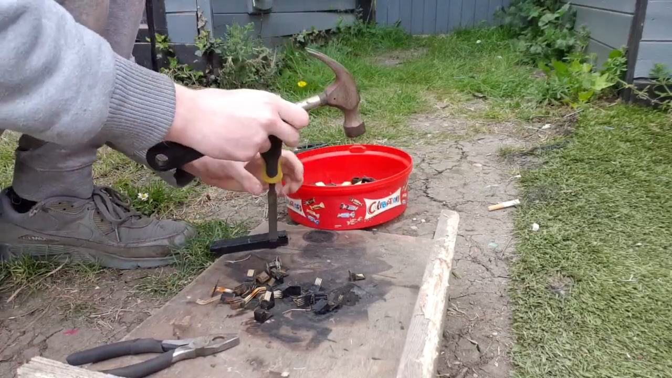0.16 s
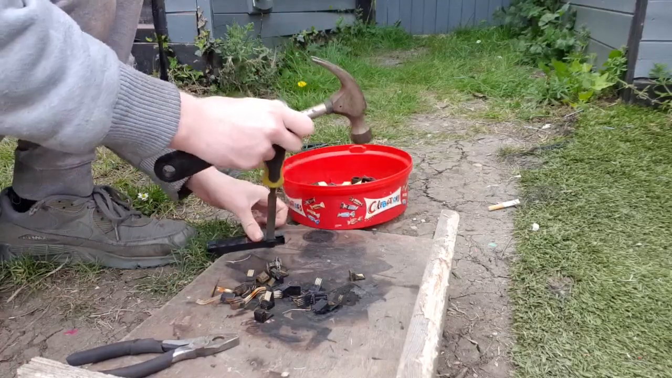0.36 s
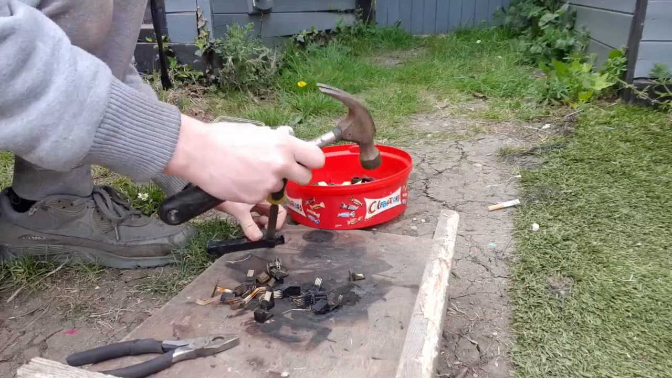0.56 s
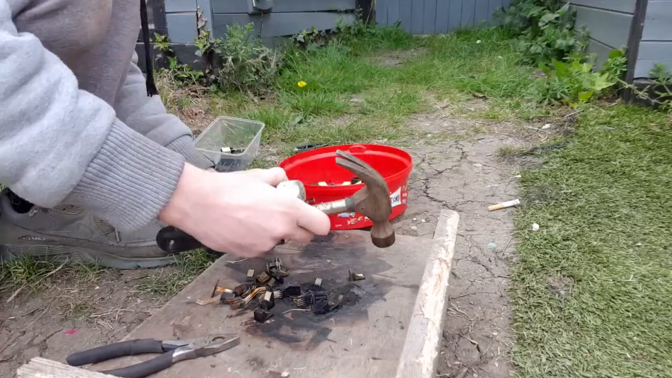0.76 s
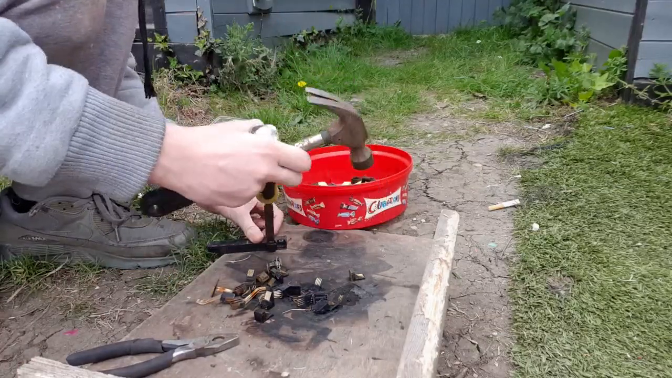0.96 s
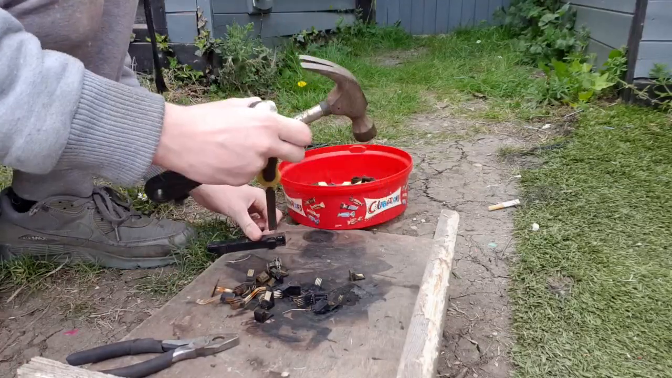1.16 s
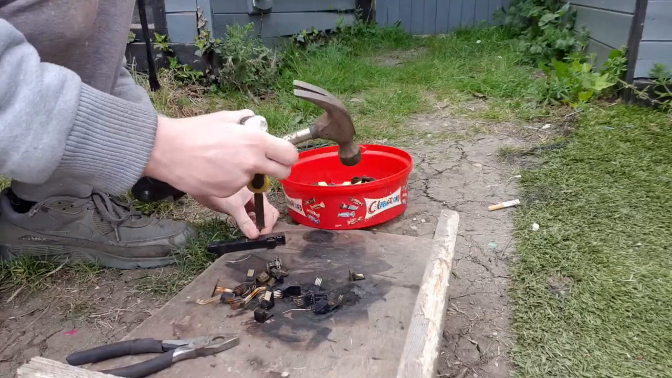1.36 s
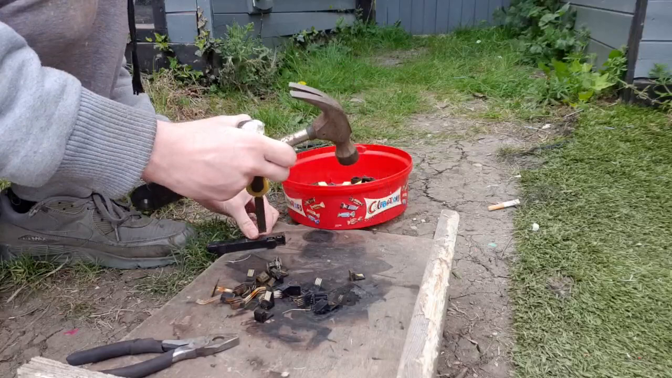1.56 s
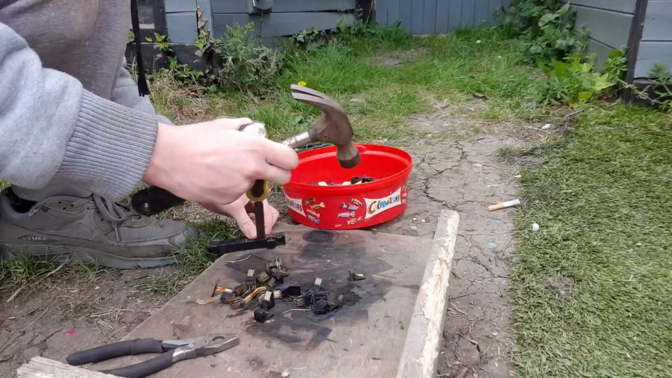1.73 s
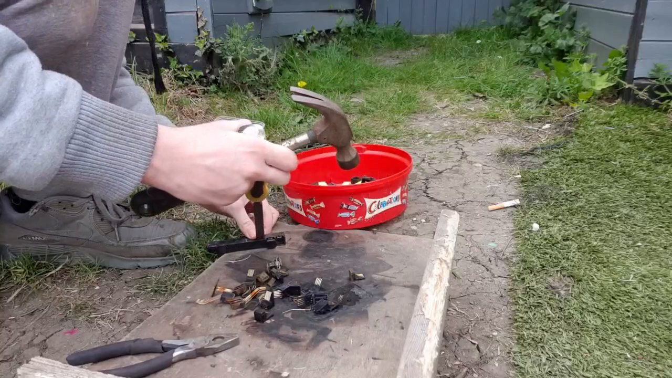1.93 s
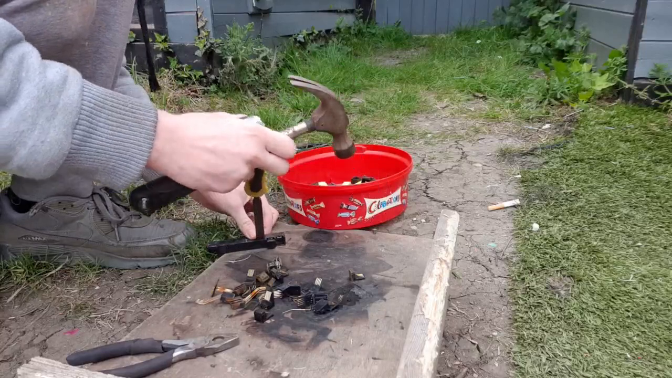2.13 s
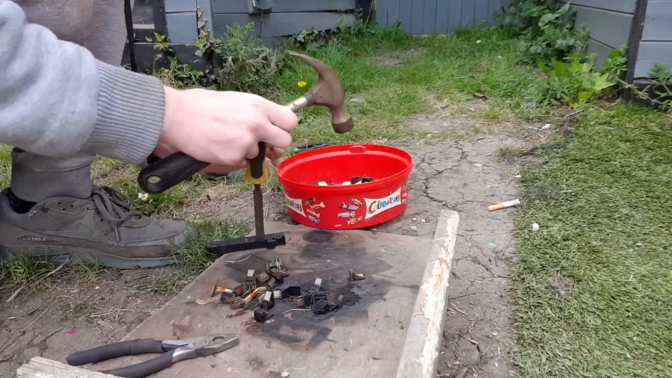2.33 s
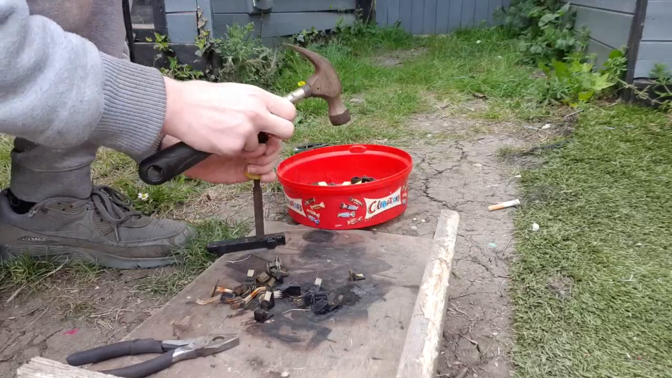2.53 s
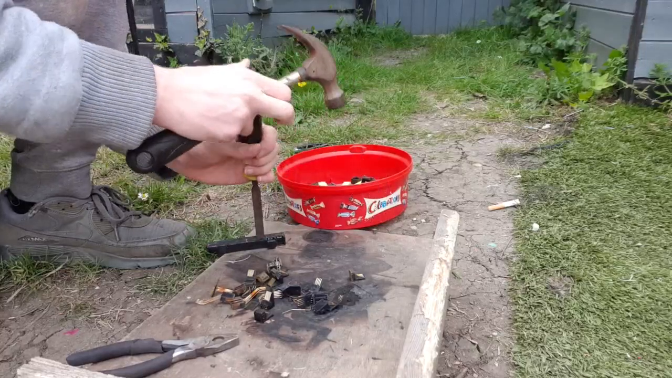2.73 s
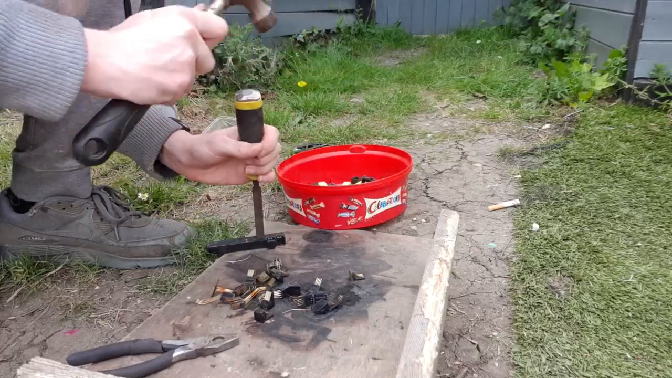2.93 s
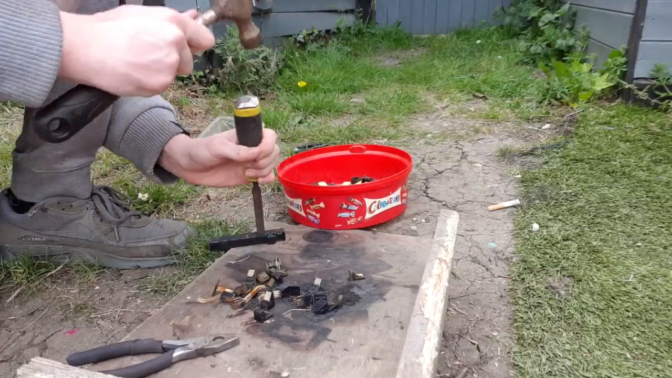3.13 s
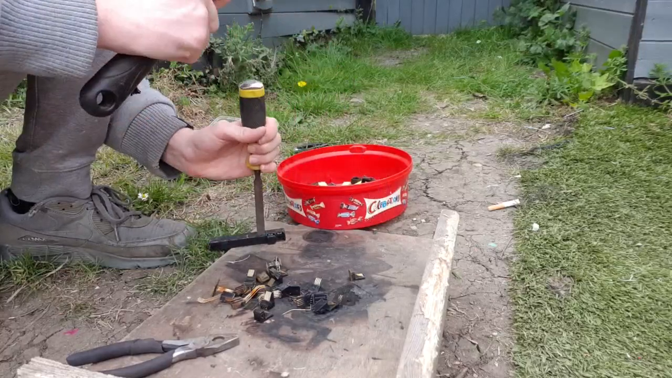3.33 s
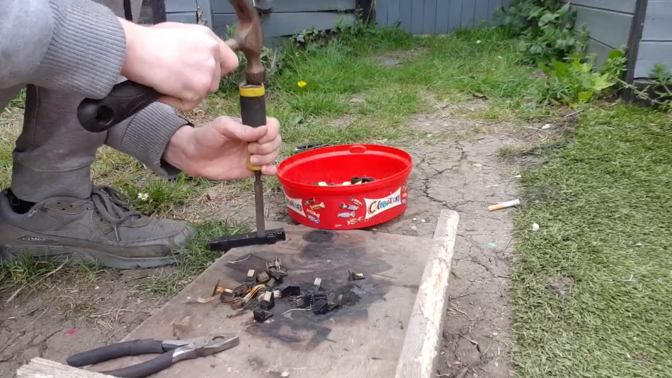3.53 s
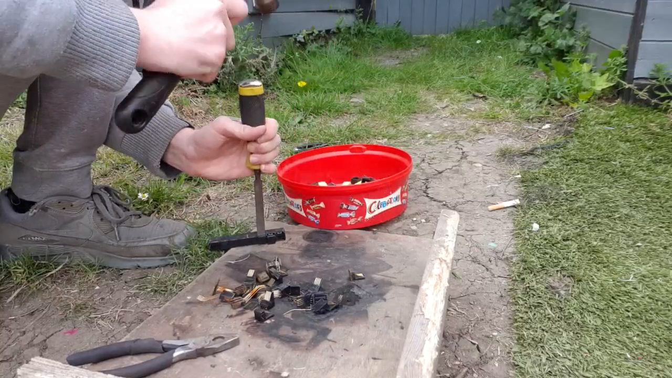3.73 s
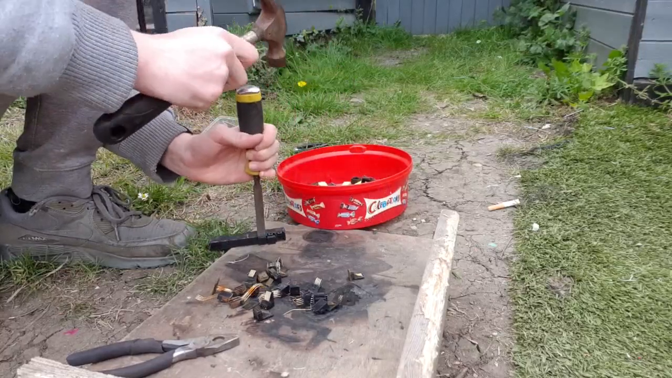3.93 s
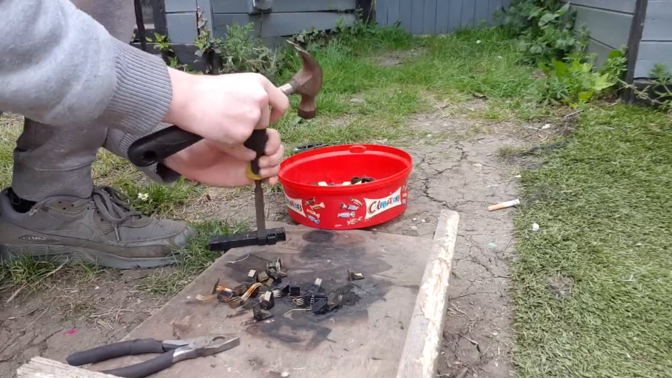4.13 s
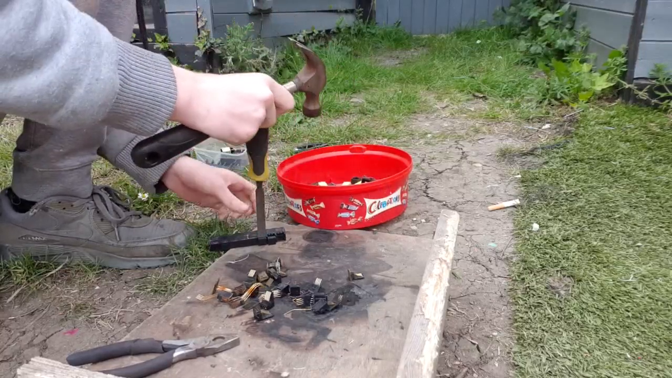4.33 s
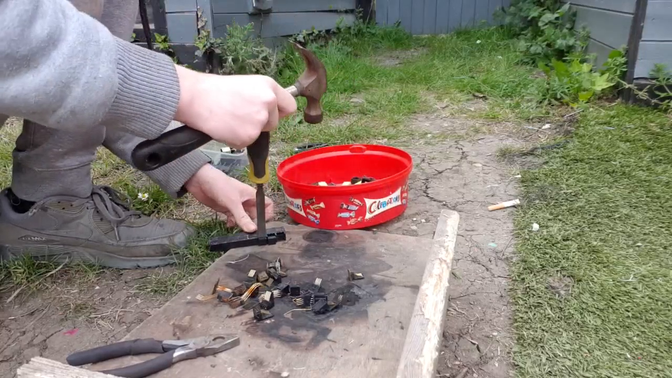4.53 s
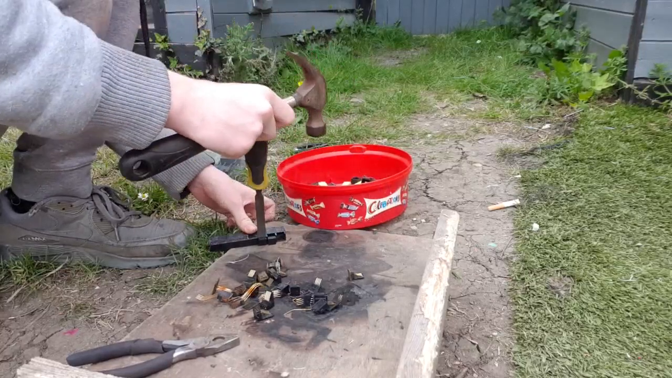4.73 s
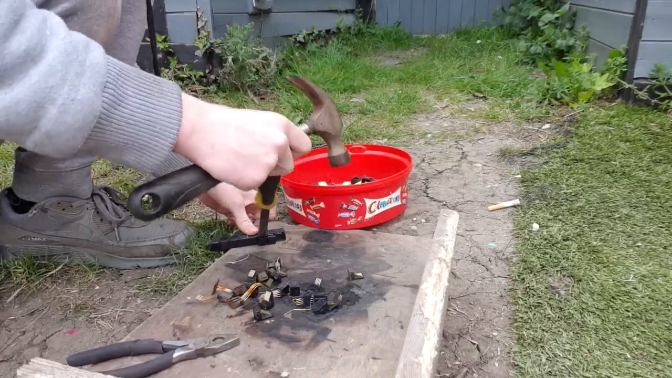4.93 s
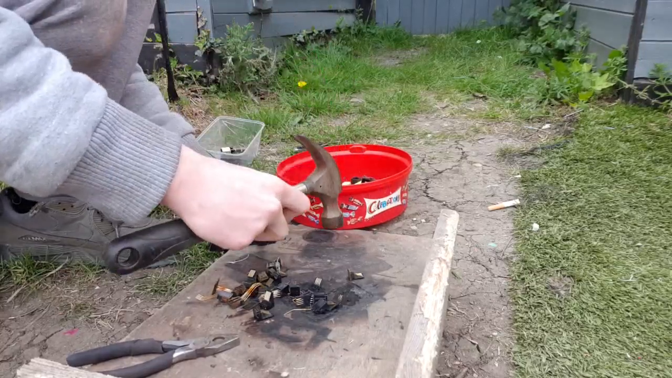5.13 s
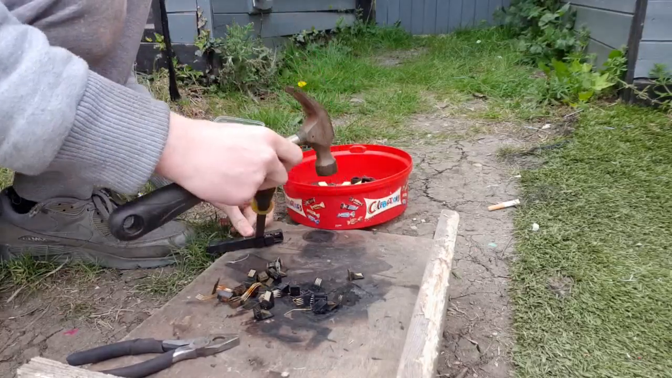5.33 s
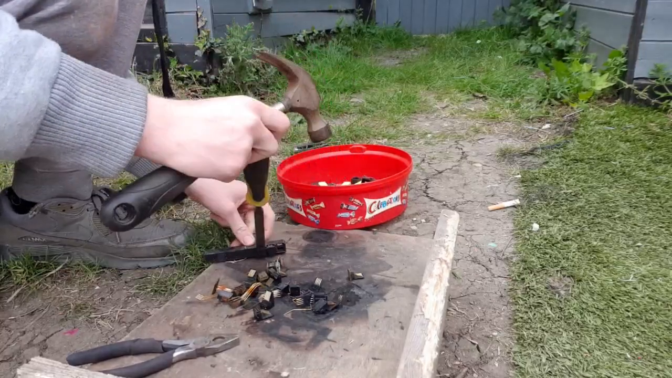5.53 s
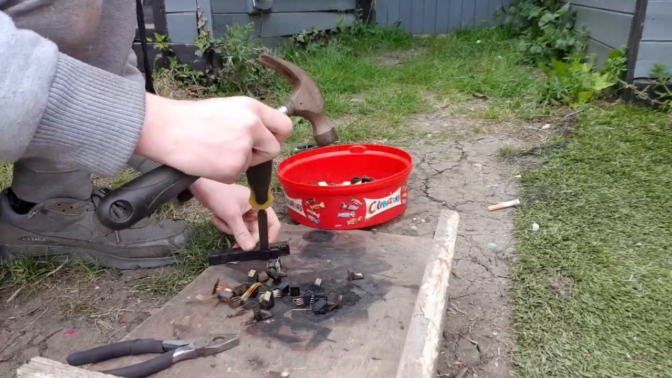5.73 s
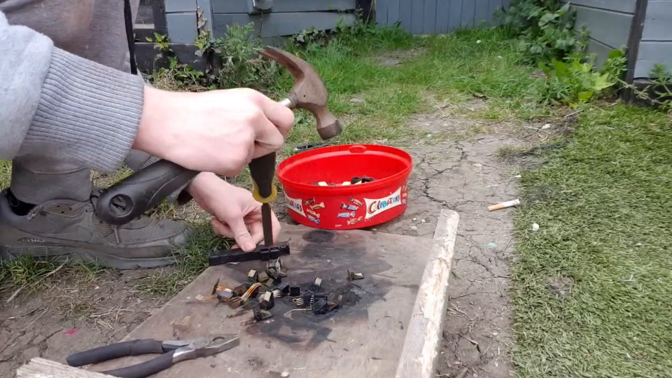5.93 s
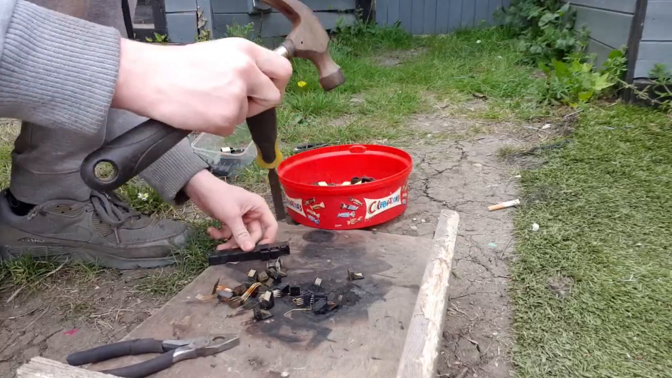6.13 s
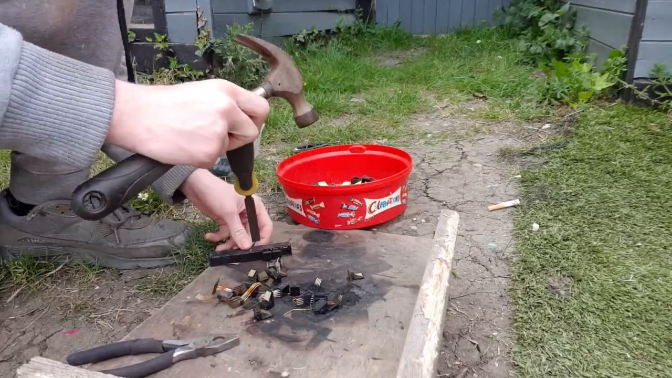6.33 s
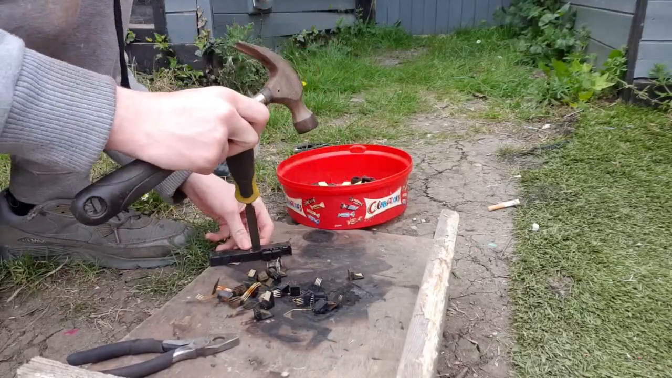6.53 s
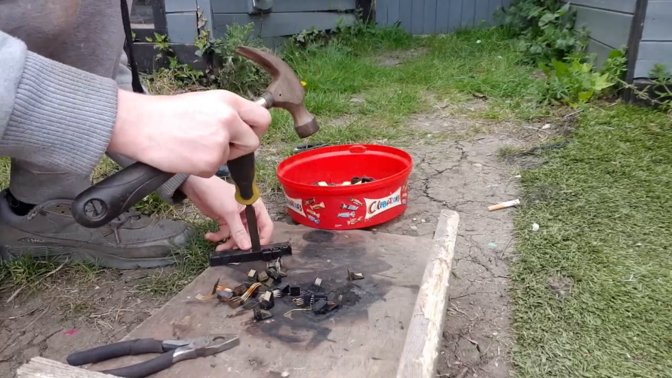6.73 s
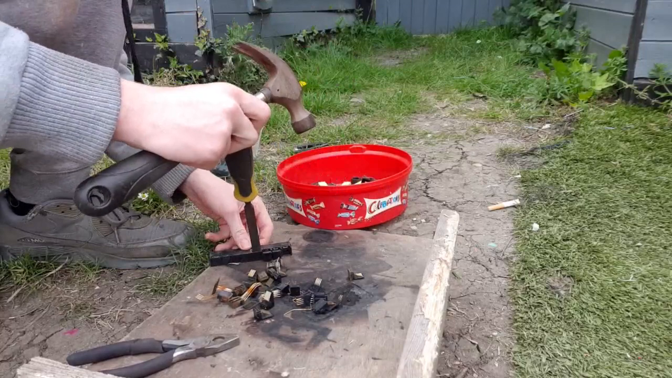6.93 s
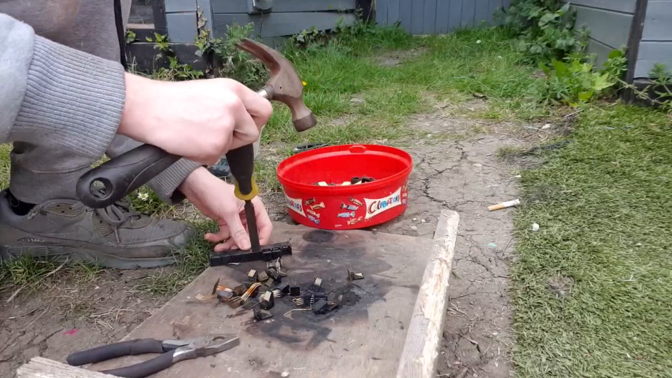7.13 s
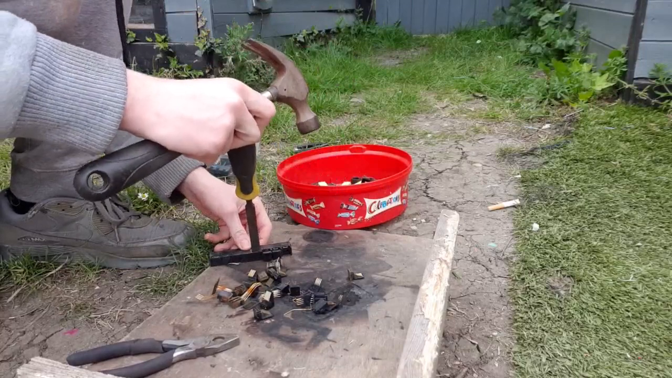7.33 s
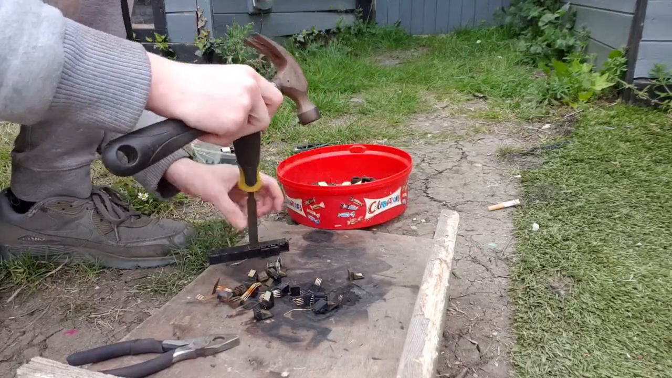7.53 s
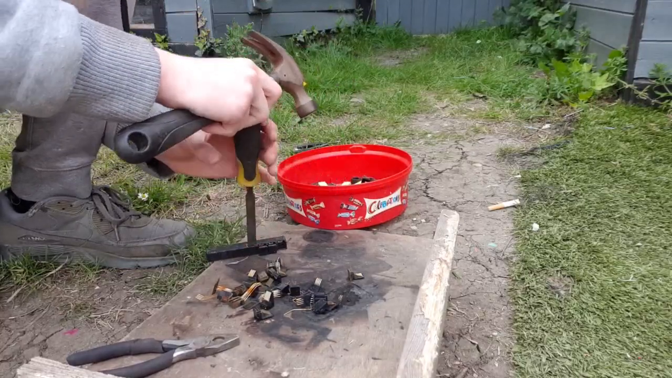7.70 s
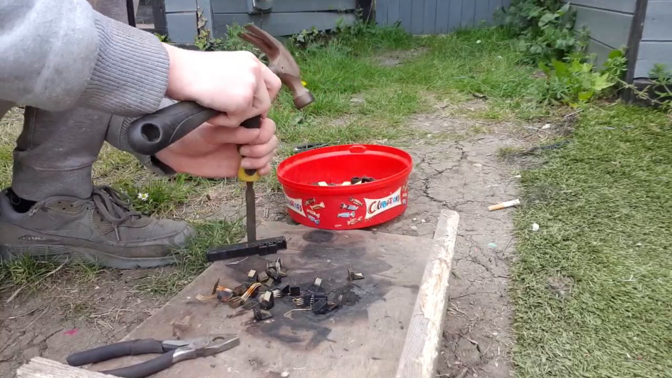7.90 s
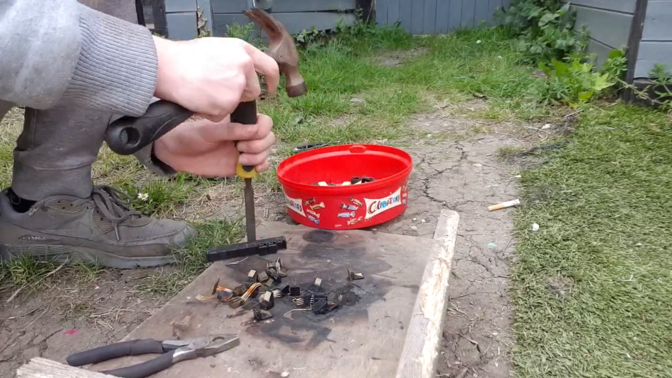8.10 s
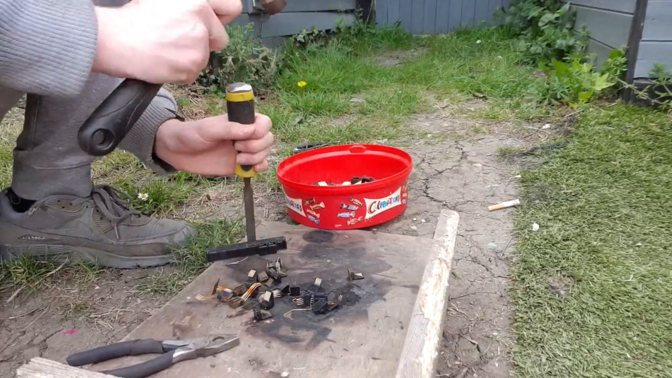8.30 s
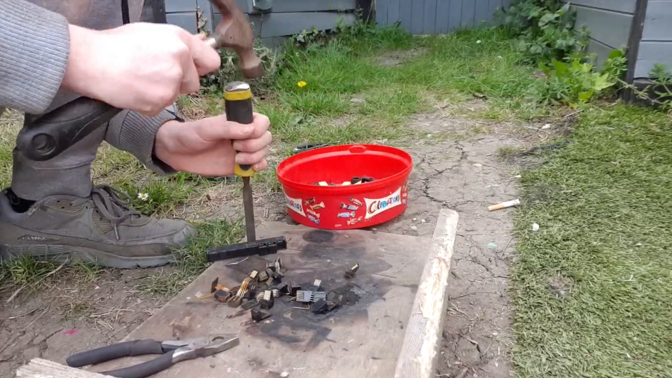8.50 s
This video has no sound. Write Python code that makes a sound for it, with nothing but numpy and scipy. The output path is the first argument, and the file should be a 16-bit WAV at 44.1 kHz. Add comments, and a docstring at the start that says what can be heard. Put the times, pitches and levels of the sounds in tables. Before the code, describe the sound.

Plastic bits are shifted and scraped on a thin plank for about three seconds, then four hard, dry hammer knocks come within just over a second, each with a woody clack and short outdoor slap. A weaker knock follows, then quiet scraping and ticking, and a last loud crack with rebounds. Low wind buffets and a very faint distant hiss are picked up close by.

```python
"""A small fenced garden: a claw hammer drives a screwdriver into plastic connectors on a wooden board.
Each blow is a noise crack of giving plastic over damped modes of board and shaft; then the blade lands
and the hammer bounces. The fences scatter it back as a short wash of noise in bands.
Between blows come light taps, ticks, clicks, a faint falling squeak, and scrapes of dense random slips.
Beneath lie shaped noises: light wind, its buffets and a faint distant hiss."""
import sys
import numpy as np
from scipy import signal
from scipy.fft import rfft, irfft, next_fast_len
from scipy.io import wavfile
from scipy.ndimage import uniform_filter1d

SR = 44100
rng = np.random.default_rng(int(sys.argv[2]) if len(sys.argv) > 2 else 0)


def master_out(mix):
    """Clip the mix to full scale and print it as 16-bit PCM to the path in sys.argv[1]."""
    frames = np.transpose(np.atleast_2d(mix))
    ceiling = np.clip(frames, -1, 1)
    pcm = np.round(ceiling * 32767).astype(np.int16)
    wavfile.write(sys.argv[1], SR, pcm)


N = 381906
TIME = np.arange(N) / SR
AGE = TIME[:SR // 5]  # time since a contact [s]
TOP_HZ = 16000  # upper limit of the wash and of the finished sound
BLOW_SAMPLES = SR // 100  # a unit blow has the energy of 10 ms at full level

# ringing of the screwdriver shaft: (nominal frequency [Hz], relative level [dB], t60 at length 1 [s])
SHAFT_MODES = [(3206, -1, 0.085), (4370, -5, 0.068), (5145, -6, .05), (5722, 0.5, .055)]
# colour of cracking and rasping plastic: (frequency [Hz], relative level [dB])
CRACK_COLOUR = [(900, -32.5), (1700, -14), (2400, -1.5), (3200, 2.5), (4200, 2.5), (5700, -3), (6600, -8),
                (7600, -19.5), (12000, -39)]
# colour of the brightest snap and scrape hiss: (frequency [Hz], relative level [dB])
SNAP_COLOUR = [(4000, -35.5), (7000, -7), (8500, -5.5), (10200, 1.5), (12800, 0), (16000, -3)]


def undb(db):
    """Decibels to gain."""
    return 10 ** (np.asarray(db) / 20)


def on_log_axis(points, size):
    """A (frequency [Hz], level [dB]) curve at the bins of a transform."""
    hz, db = np.transpose(points)
    bin_hz = np.arange(size // 2 + 1) * SR / size
    return np.interp(np.log(bin_hz + 1), np.log(hz), db)


def colour(x, points, size=2048):
    """Causal filter of unit energy: folding the cepstrum gives the spectrum its minimum phase."""
    cepstrum = irfft(np.log(undb(on_log_axis(points, size))))
    cepstrum[1:size // 2] *= 2
    cepstrum[size // 2 + 1:] = 0
    response = irfft(np.exp(rfft(cepstrum)))
    response /= np.linalg.norm(response)
    return signal.fftconvolve(x, response[None], axes=1)[:, :x.shape[1]]


def noise(size, width):
    """Stereo noise; width is side over mid."""
    mid, side = rng.standard_normal((2, size))
    return np.array([mid + width * side, mid - width * side]) / np.hypot(1, width)


def add(out, s, sound):
    """Mix a sound in at a time."""
    start = max(int(s * SR), 0)
    out[:, start:start + sound.shape[-1]] += sound[..., :N - start]


def wind():
    """Wind rumbles on the microphone ports: low noise that follows a slow level curve."""
    # strength of the wind: (time [s], level before a 2 dB lift [dB])
    wind_curve = [(0, -62), (.8, -76.5), (1.12, -60), (1.75, -79.5), (2.0, -61.5), (3.0, -59), (3.5, -67.5),
                  (3.95, -59), (4.25, -71.5), (5.6, -71.5), (6.6, -62.5), (8.66, -68)]
    # colour of the rumble: (frequency [Hz], relative level [dB])
    rumble_colour = [(20, -14.5), (45, 0.5), (62, 6), (100, -5), (160, -16), (250, -23.5), (500, -60.5)]
    level_db = np.interp(TIME, *np.transpose(wind_curve)) + 2.0
    return undb(level_db) * colour(noise(N, width=0.38), rumble_colour)


def buffets():
    """Short Gaussian swells of low noise, mostly on the right port."""
    # single buffets: (peak time [s], Gaussian length [s], level before the side gains [dB])
    gust_list = [(1.053, 0.025, -49), (1.898, 0.049, -42), (2.061, 0.019, -42.5), (2.163, 0.024, -50),
                 (2.455, 0.05, -38.5), (2.697, 0.029, -48.5), (2.92, 0.095, -50.5), (6.705, 0.057, -50)]
    # colour of a buffet: (frequency [Hz], relative level [dB])
    buffet_colour = [(20, -17), (45, 1.5), (70, 6), (110, -0.5), (170, -17.5), (260, -27), (500, -61.5)]
    swell = sum(undb(db) * np.exp(-((TIME - s) / length) ** 2) for s, length, db in gust_list)
    side_gain = undb([[-16], [3]])  # left, right
    return swell * colour(noise(N, width=0.89), buffet_colour) * side_gain


def distant_hiss():
    """A faint hiss of coloured noise that follows a slow level curve."""
    # strength of the hiss: (time [s], level [dB])
    hiss_curve = [(0, -70.5), (1.4, -75), (2.6, -66.5), (3.4, -73.5), (4.4, -75), (6.1, -73.5),
                  (7.8, -67.5), (8.66, -68.5)]
    # colour of the air: (frequency [Hz], relative level [dB])
    air_colour = [(30, -0.5), (150, 2.5), (350, -7), (680, -6.5), (1150, -17.5), (1600, -13), (2100, -5.5),
                  (3800, -14), (6000, -23.5), (8000, -36), (12500, -20), (16000, -29.5)]
    level_db = np.interp(TIME, *np.transpose(hiss_curve))
    return undb(level_db) * colour(noise(N, width=.7), air_colour)


def drain(power, seconds):
    """Energy that leaks away with a time constant."""
    keep = np.exp(-1 / (seconds * SR))
    return signal.lfilter([1 - keep], [1, -keep], power)


def garden(x, count=10):
    """Ground, plants and fences scatter each band's energy into a smooth, short wash of noise."""
    # scattered tail: (frequency [Hz], level [dB], t60 of the near echo [s])
    tail_bands = [(603, -18.5, .33), (1600, -5, 0.17), (4500, -7, 0.235), (12000, -5, 0.125)]
    late_db, late_stretch = -14, 2  # far fences: echo level, and decay time over the near one
    edges = np.geomspace(300, TOP_HZ, count)
    hz, tail_db, tail_t60 = np.transpose(tail_bands)
    wash, out = noise(N, width=0.94), 0
    for lo, hi in zip(edges, edges[1:]):
        centre = np.log(lo * hi) / 2
        db = np.interp(centre, np.log(hz), tail_db)
        t60 = np.interp(centre, np.log(hz), tail_t60)
        band = signal.butter(3, [lo, hi], "bandpass", fs=SR, output="sos")
        # a trace of noise keeps the power above zero
        power = np.mean(signal.sosfilt(band, x + 1e-12 * wash) ** 2, axis=0)
        power = drain(power, .004)  # the echoes build up, then drain away
        seconds = t60 / np.log(1e6)
        near = drain(power, seconds)
        far = undb(late_db) ** 2 * drain(power, late_stretch * seconds)
        carrier = signal.sosfilt(band, wash)
        out = out + undb(db) * np.sqrt(near + far) * carrier / carrier.std()
    return out


def squeak(blur_hz=45):
    """A faint tone, blurred by slow noise, slides down while the connector is set in place."""
    # path of the squeak: (time [s], frequency [Hz], level [dB])
    squeak_path = [(4.61, 578, -76), (4.63, 519, -71.5), (4.68, 488, -66.5), (4.72, 440, -63),
                   (4.76, 394, -67.5), (4.79, 402, -56)]
    s, hz, db = np.transpose(squeak_path)
    waver = signal.sosfilt(signal.butter(2, blur_hz, fs=SR, output="sos"), rng.standard_normal(N))
    phase = 2 * np.pi * np.cumsum(np.interp(TIME, s, hz)) / SR
    tone = waver / waver.std() * np.sin(phase)
    return undb(np.interp(TIME, s, db, left=-np.inf, right=-np.inf)) * tone


def unit_blow(x):
    """Scale to the energy of 10 ms at full level."""
    return x * np.sqrt(BLOW_SAMPLES / np.sum(np.atleast_2d(x) ** 2, axis=1).mean())


def fade(t60):
    """Exponential decay, 60 dB down after t60 seconds."""
    return np.exp(-np.log(1000) * AGE / max(t60, 1e-4))


def ring(modes, length, scatter_db, phase_spread=1.2):
    """Damped modes start nearly together; shares and pitches change with the place that is struck."""
    hz, db, t60 = np.transpose(modes)[:, :, None]
    share, detune, start = rng.standard_normal((3, len(modes), 1))
    phase = 2 * np.pi * hz * (1 + .008 * detune) * AGE + phase_spread * start
    rise = 1 - np.exp(-2 * hz * AGE)  # a mode needs half a cycle to get going
    decay = np.exp(-np.log(1000) * AGE / (t60 * length))
    tones = undb(db + scatter_db * share) * rise * decay * np.sin(phase)
    return unit_blow(np.sum(tones, axis=0))


def burst(points, t60, width, rise_s=.0003):
    """A dying crowd of dense resonances, made of coloured noise."""
    envelope = fade(t60) * (1 - np.exp(-AGE / rise_s))
    return unit_blow(colour(noise(len(AGE), width) * envelope, points))


def board(length):
    """The board's three voices, from its modes: whole-plank thud, hollow body and hard clack."""
    # ringing of the board: (nominal frequency [Hz], relative level [dB], t60 at length 1 [s])
    board_modes = [(123, -8.5, 0.18), (176.4, -0.5, 0.1), (215, -5.5, 0.12), (237, -13.5, 0.26),
                   (359, -7.5, 0.13), (411, -4, 0.15), (487, 1, 0.066), (546, 5, 0.07), (602, 2.5, 0.096),
                   (698, 3, 0.076), (769, -4, .055), (825, -1.5, 0.035), (995, -4, 0.05),
                   (1210, -4.5, 0.14), (1252, -3, .04), (1363, 2.5, 0.047), (1597, -8.5, .04),
                   (1765, -2, 0.053), (1830, -6.5, .035), (2047, -3.5, 0.055)]
    # dense resonances of the body: (frequency [Hz], relative level [dB])
    body_colour = [(90, -32.5), (190, -14), (310, -9), (430, -3.5), (620, 1.5), (850, 5), (1050, -8.5),
                   (1400, -33.5)]
    # dense resonances of the clack: (frequency [Hz], relative level [dB])
    clack_colour = [(700, -30), (1080, -3.5), (1330, 6), (1580, -7.5), (1900, -3.5), (2300, -7),
                    (3300, -34)]
    low = [m for m in board_modes if m[0] <= 300]
    middle = [m for m in board_modes if 300 < m[0] <= 1100]
    high = [m for m in board_modes if m[0] > 1100]
    thud = ring(low, length, scatter_db=1.5)
    body = undb(-2.5) * ring(middle, length, scatter_db=5.0)
    body = body + undb(-8) * burst(body_colour, t60=0.073 * length, width=0.13)
    clack = undb(-4) * ring(high, length, scatter_db=2.0)
    clack = clack + undb(-1.5) * burst(clack_colour, t60=0.053 * length, width=0.33)
    return thud, body, clack


def unevenness(spread_db, size):
    """Random strengths, each held for a few samples; unit power."""
    held = np.repeat(undb(spread_db * rng.standard_normal(N // size + 1)), size)[:N]
    return held / np.sqrt(np.mean(held ** 2))


def scraping():
    """Dense slips, bunched as the blade catches and lets go, ring board and shaft and rasp on plastic."""
    # scrapes and slides: (swell peak [s], Gaussian rise [s], base level [dB],
    # hardness before the slopes [dB], extra clack [dB])
    scrape_list = [(0.01, 0.021, -62, 10.5, -5.5), (0.123, 0.03, -61, -1.5, -17),
                   (0.234, 0.014, -33, 1.5, 9.5), (0.288, 0.018, -37.5, 4.5, 5.5),
                   (0.455, 0.0068, -50.5, 2, 1.5), (0.851, 0.033, -57, 11.5, 3.5),
                   (1.157, .037, -55, 2, 2.5), (1.448, 0.026, -71.5, -6, -7), (1.779, 0.029, -58, -20, 4),
                   (2.178, 0.012, -65.5, 7, -2.5), (3.298, 0.02, -74, -12, -5),
                   (4.182, 0.013, -49.5, 1, 2.5), (4.429, .025, -68.5, -2, 7.5),
                   (5.01, 0.062, -57, -6, -1.5), (5.213, 0.025, -47, -9, 2),
                   (5.319, 0.074, -66, 12.5, -7.5), (5.421, 0.046, -51.5, 4, -4), (5.519, 0.06, -63, 9, -2),
                   (5.681, .036, -69.5, 6.5, -0.5), (6.195, 0.024, -57, 4.5, -1.5),
                   (6.57, 0.032, -53.5, -6, 4.5), (7.09, 0.008, -65.5, -3, -9),
                   (7.487, 0.011, -57.5, 19, -8), (7.519, 0.026, -42.5, 8, 1), (7.574, .033, -49.5, 9, -5),
                   (7.975, .027, -53.5, -9, -8)]
    # base level of each voice: (body [dB], clack [dB], grit [dB], hiss [dB])
    voice_db = (1, -9, -13, -26)
    # lift by hardness: (body [dB/dB], clack [dB/dB], grit [dB/dB], hiss [dB/dB])
    voice_slope = (0, .65, 1, 1.1)
    fall_ratio = 1.264  # fall time over rise time
    shaft_db = -11  # ringing of the scraped shaft, relative to the grit
    slips = unevenness(spread_db=2.5, size=30)
    catches = uniform_filter1d(unevenness(spread_db=3, size=450), size=150)
    rung, rasp = np.zeros((2, 2, N))
    for s, rise, db, hardness_db, clack_db in scrape_list:
        start = max(s - .2, 0)
        span = int(start * SR) + np.arange(SR // 2)
        t = TIME[span] - s
        swell = np.exp(-(t / np.where(t < 0, rise, fall_ratio * rise)) ** 2)
        swell = swell * slips[span] * catches[span]
        push_db = np.add(voice_db, db) + hardness_db * np.array(voice_slope)
        push = undb(push_db)[:, None] * swell
        thud, body, clack = board(length=0.45)  # each place rings differently
        shaft = ring(SHAFT_MODES, length=0.33, scatter_db=8)[None]
        voices = (body + undb(-8.5) * thud, undb(clack_db) * clack, undb(shaft_db) * shaft)
        for force, voice in zip(push, voices):  # the grit force drives the shaft
            rough_force = force * rng.standard_normal((1, len(t)))
            add(rung, start, signal.fftconvolve(rough_force, voice, axes=1))
        add(rasp, start, push[2:])
    grit, hiss = rasp
    grit_sound = colour(grit * noise(N, width=0.9), CRACK_COLOUR)
    hiss_sound = colour(hiss * noise(N, width=1.0), SNAP_COLOUR)
    return rung / np.sqrt(BLOW_SAMPLES) + grit_sound + hiss_sound


def contact(mix_db, level_db, thud_db=0, hardness_db=0, snap_db=0):
    """Levels of the five voices for one contact; a harder contact lifts the treble."""
    # lift by hardness: (thud [dB/dB], body [dB/dB], clack [dB/dB], crack [dB/dB], snap [dB/dB])
    hardness_slope = (0, 0, .6, 1, 1.25)
    extra_db = np.array([thud_db, 0, 0, 0, snap_db])
    return np.add(mix_db, level_db) + hardness_db * np.array(hardness_slope) + extra_db


def knock(thud_db, body_db, clack_db, crack_db, snap_db, crush_s, length):
    """The plastic gives way in a short crunch, the shaft pings and the board rings beneath."""
    thud, body, clack = board(length)
    crack = burst(CRACK_COLOUR, t60=8 * crush_s, width=.55)
    crack = crack + undb(-10.5) * ring(SHAFT_MODES, length, scatter_db=4.5)
    snap = burst(SNAP_COLOUR, t60=9 * crush_s, width=0.93)
    wood = undb(thud_db) * thud + undb(body_db) * body + undb(clack_db) * clack
    return wood + undb(crack_db) * crack + undb(snap_db) * snap


def handling():
    """Light taps, ticks of fragments and late hammer bounces, and clicks of the plastic.

    Yields (time [s], sound, echo [dB])."""
    # light taps, ticks and late bounces: (time [s], base level [dB], extra thud [dB],
    # hardness before the slopes [dB])
    tap_list = [(3.192, -52.5, -7, -8), (3.253, -61, -10, -14), (3.771, -48.5, -6, -6),
                (3.886, -33, -11, -10), (4.618, -62.5, -18, 2.5), (4.908, -53, -0.5, 1.5),
                (5.016, -53.5, -1.5, 8), (5.06, -54, -12, -2.5), (5.374, -43, -12, -16),
                (5.571, -56.5, -10, 6), (5.731, -61, 2, 1), (6.528, -48.5, 1.5, 5.5),
                (6.602, -44.5, -7, -0.5), (7.066, -61.5, 6.5, -4), (7.95, -49, 5.5, -11),
                (8.439, -42.5, -5, 22), (8.493, -47.5, -1, 21), (8.586, -49, -15, 6)]
    # the plastic clicks under the blade: (time [s], base level [dB],
    # hardness before the slopes [dB], extra snap [dB])
    click_list = [(0.461, -39.5, 4, 6.5), (0.956, -30.5, -4, 16.5), (5.766, -58.5, 9, -2),
                  (5.899, -39, 3, -5.5), (7.907, -62.5, 6.5, 7.5)]
    # voices of a tap, tick or late bounce: (thud [dB], body [dB], clack [dB], crack [dB], snap [dB])
    tap_mix = (3, -0.5, -14.5, -23.5, -37.5)
    # voices of a click: (thud [dB], body [dB], clack [dB], crack [dB], snap [dB])
    click_mix = (-21.5, -1, -13, -17, -22)
    for s, db, thud_db, hardness_db in tap_list:
        levels = contact(tap_mix, db, thud_db, hardness_db)
        yield s, knock(*levels, crush_s=.002, length=0.55), -2.5
    for s, db, hardness_db, snap_db in click_list:
        levels = contact(click_mix, db, hardness_db=hardness_db, snap_db=snap_db)
        yield s, knock(*levels, crush_s=.002, length=0.97), -4.5


def blows(count=3):
    """Hammer strikes, plastic gives way, blade lands, hammer bounces: (time [s], sound, echo [dB])."""
    # hammer blows: (time [s], base level [dB], extra thud [dB], hardness before the slopes [dB],
    # extra snap [dB], time the plastic gives way [s], landing of the blade over the blow [dB],
    # first rebound after [s], rebound over the blow [dB],
    # loss each time the count of bounces doubles [dB], echo of the strike [dB])
    blow_list = [(2.996, -12.5, -1.5, -2.5, -2, .006, -7, 0.048, -17, 19.5, -3),
                 (3.537, -20, -5, 4.5, -1.5, .004, 1.5, 0.054, -6.5, 16.5, -2.5),
                 (3.789, -15, -1.5, 0.5, -1.5, .003, -1, .0683, -4, 23.5, -2),
                 (4.0893, -20, -1, -8.5, -16.5, .003, -3.5, 0.042, -18, 26, -6.5),
                 (4.7897, -21.5, -3.5, 1.5, -12, .003, -12.5, .05, -33, 30, -11.5),
                 (8.381, -14, 1.5, -6, -3.5, .012, -1, 0.074, -1.5, 27.5, 1.5)]
    # voices of the strike: (thud [dB], body [dB], clack [dB], crack [dB], snap [dB])
    strike_mix = (-9.5, 0.5, -2, -2.5, -9.5)
    # voices of the landing: (thud [dB], body [dB], clack [dB], crack [dB], snap [dB])
    landing_mix = (-4, 1, -3.5, -3, -9)
    # voices of a rebound: (thud [dB], body [dB], clack [dB], crack [dB], snap [dB])
    rebound_mix = (-14.5, 0, -8.5, -22, -37)
    cushion_db_per_s = 1100  # the longer the plastic gives way, the duller the blade lands
    bounce_s = .0642  # the hammer chatters on the handle at this interval
    for (s, db, thud_db, hardness_db, snap_db, give_s, landing_db,
         rebound_s, rebound_db, loss_db, echo_db) in blow_list:
        levels = contact(strike_mix, db, thud_db, hardness_db, snap_db)
        yield s, knock(*levels, crush_s=.0019, length=.85), echo_db
        cushioned_db = hardness_db - cushion_db_per_s * give_s
        levels = contact(landing_mix, db + landing_db, thud_db, cushioned_db, snap_db)
        yield s + give_s, knock(*levels, crush_s=0.0016, length=0.71), echo_db - 2.0
        for k in range(count):
            bounce_db = db + rebound_db - loss_db * np.log2(k + 1)
            levels = contact(rebound_mix, bounce_db)
            yield s + rebound_s + k * bounce_s, knock(*levels, crush_s=.003, length=.6), -6


def hammering():
    """Every blow and lighter contact, and the part that escapes the hands to the fences."""
    near, spread = np.zeros((2, 2, N))
    for s, sound, echo_db in [*blows(), *handling()]:
        add(near, s, sound)
        add(spread, s, undb(echo_db) * sound)
    return near, spread


def scene():
    """The work on the board, its echo and the open air."""
    contacts, spread = hammering()
    rubbing = scraping() + squeak()
    bass_cut = signal.butter(2, 95, "highpass", fs=SR, output="sos")  # a small plank radiates little bass
    left, right = signal.sosfilt(bass_cut, contacts + rubbing)
    left = np.roll(left, 2)  # the sound reaches the right port two samples earlier
    echo = garden(spread + undb(-4.0) * rubbing)
    return np.array([left, right]) + echo + wind() + buffets() + distant_hiss()


def record(dry):
    """Each port has its own colour; the loudest peaks are rounded and the top is cut."""
    # balance of the two microphone ports: (frequency [Hz], left minus right [dB])
    port_balance = [(150, -.7), (550, -2.2), (1300, -.3), (2100, -1.5), (3100, -1), (5200, -6), (6600, -4),
                    (8500, 10), (10500, 4), (14000, 2)]
    size = next_fast_len(N + N % 2, True)
    half_db = on_log_axis(port_balance, size) / 2
    heard = irfft(rfft(dry, size) * undb(np.array([half_db, -half_db])), size)[:, :N]
    rounded = np.tanh(0.88 * heard) / 0.88
    return signal.sosfilt(signal.ellip(8, .2, 80, TOP_HZ, fs=SR, output="sos"), rounded)


dry = scene()
out = record(dry)
master_out(out)
```